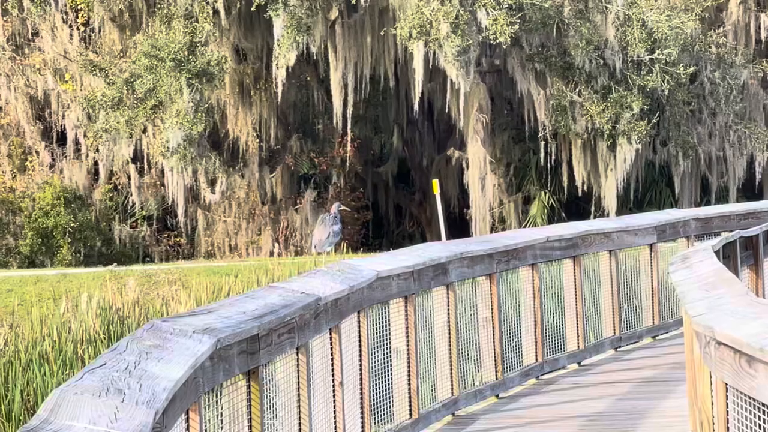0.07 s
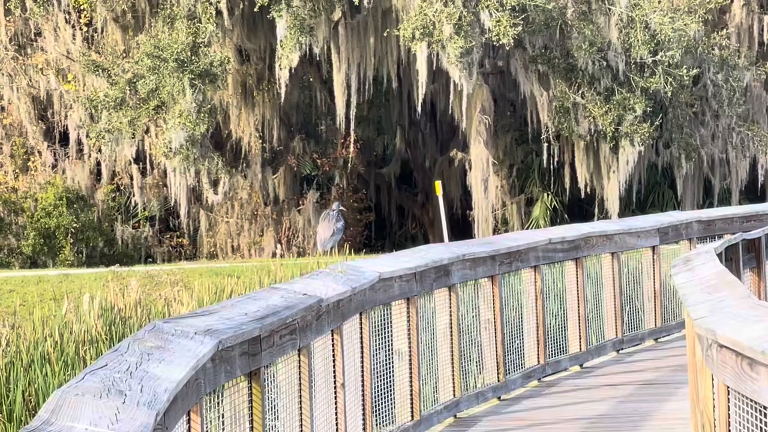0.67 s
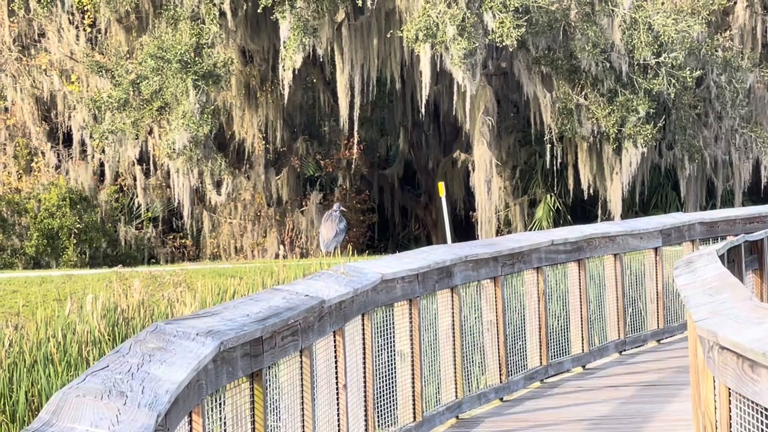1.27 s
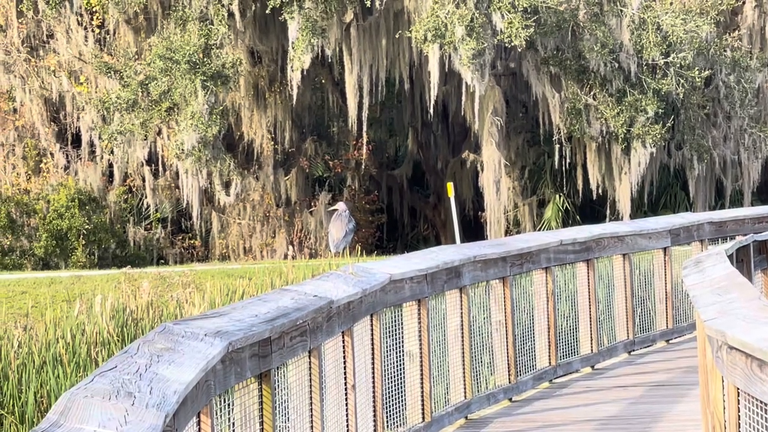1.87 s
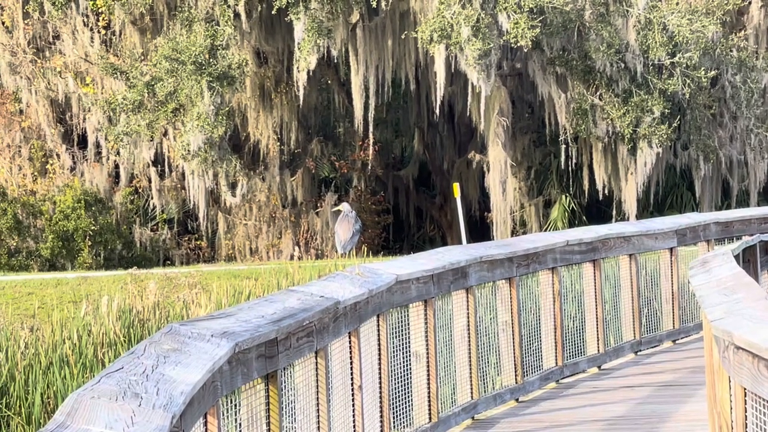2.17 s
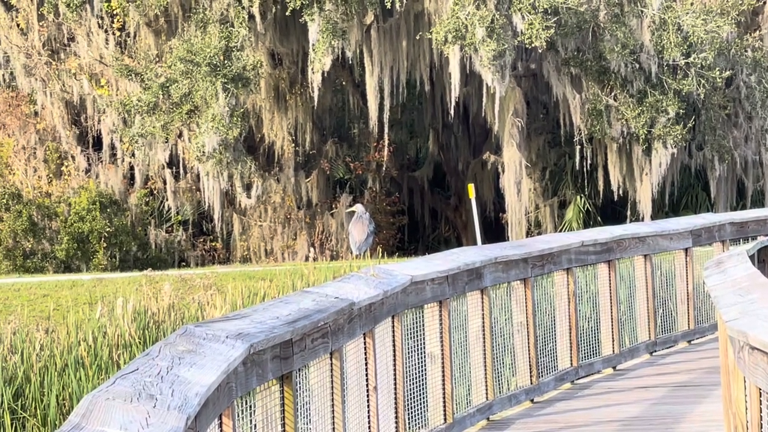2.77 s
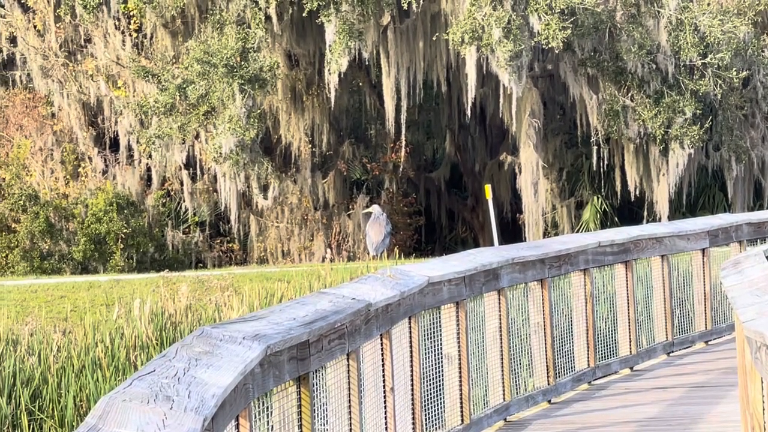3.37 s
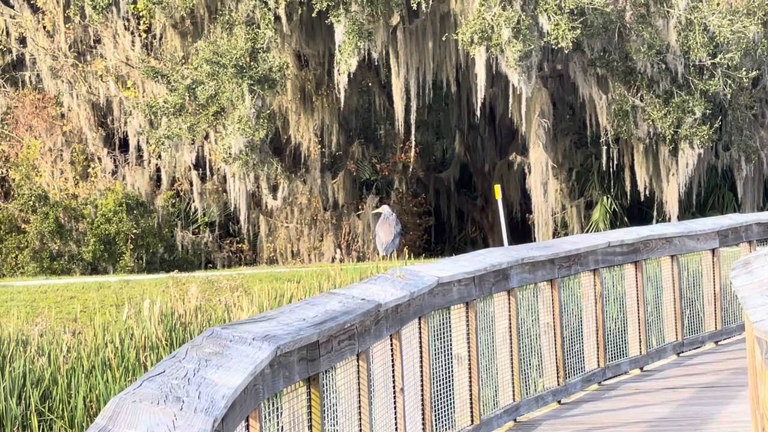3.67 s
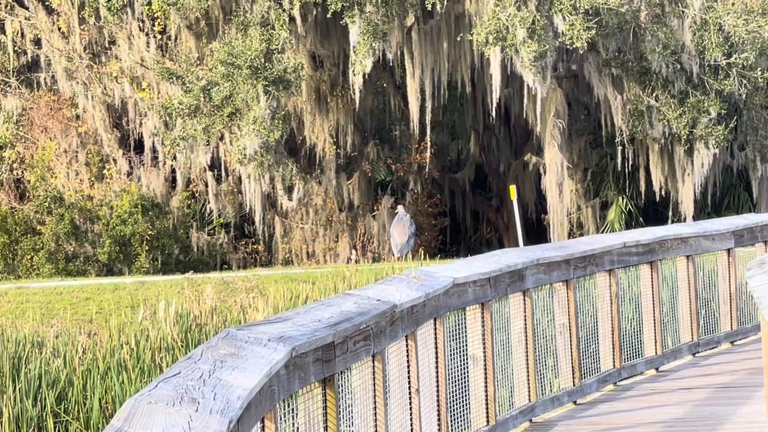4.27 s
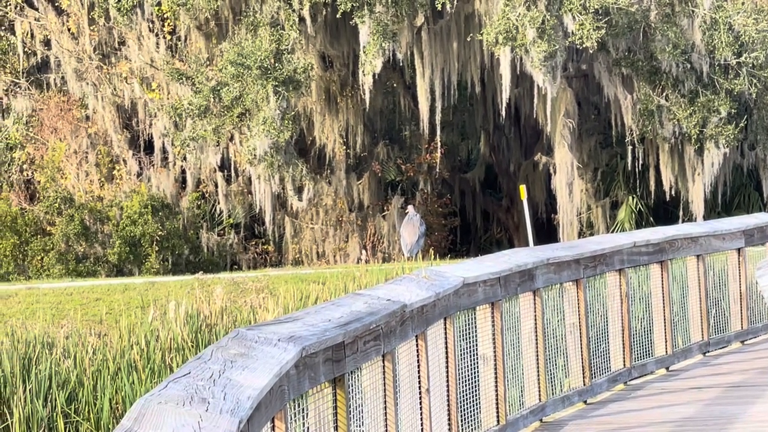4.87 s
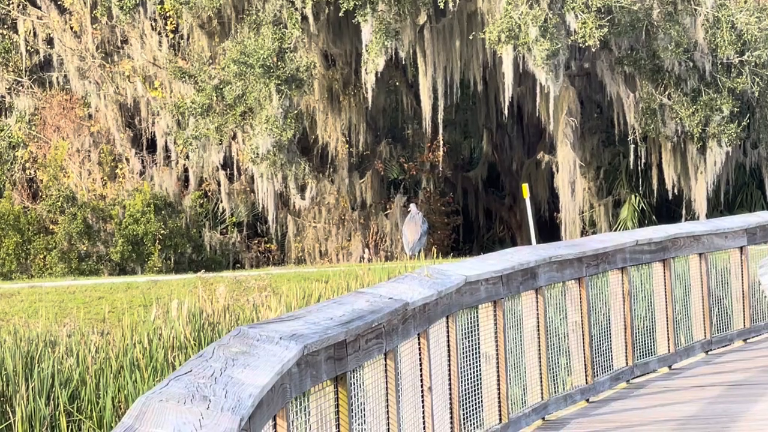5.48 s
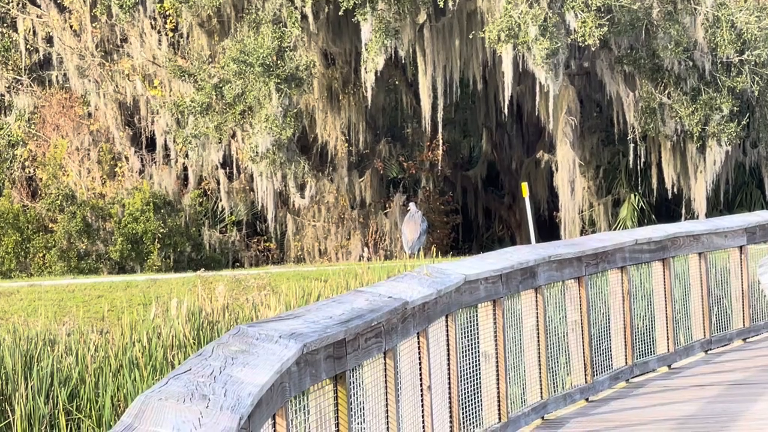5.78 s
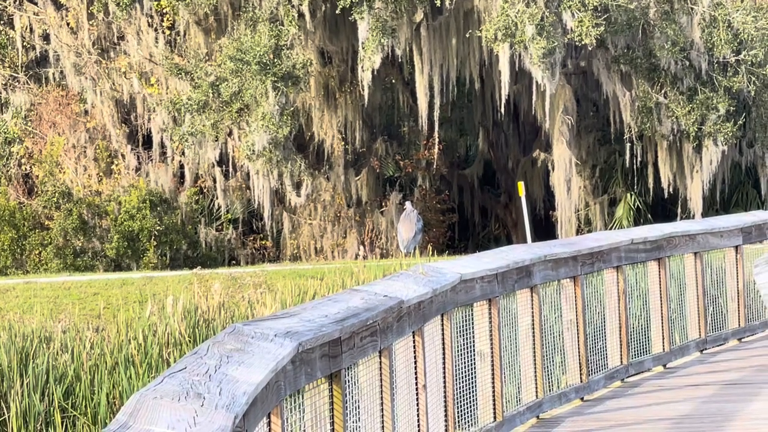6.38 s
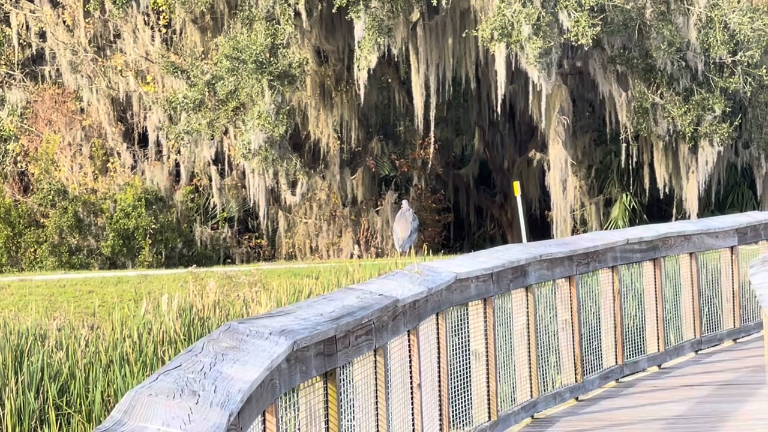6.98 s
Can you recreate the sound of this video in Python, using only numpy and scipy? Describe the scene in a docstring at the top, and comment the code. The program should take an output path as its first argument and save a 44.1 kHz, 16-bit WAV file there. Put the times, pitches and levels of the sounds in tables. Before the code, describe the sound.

A busy road far away is heard across a still marsh through a hand-held microphone. For the whole seven seconds, a deep, unevenly throbbing engine rumble blends with a soft, dull wash of tyres and a very faint hiss. One low exhaust drone is strongest at about 0.3 seconds, then fades into the distance over the next few seconds. Barely audible high blips and finger rubs begin near 0.6 seconds. At about 0.8 seconds there is a small dry snap close to the microphone, followed by tiny ticks. A soft, short hollow knock, like a plank, comes at 2 seconds. A second, weaker snap with a tick follows at 4 seconds. Very faint ticks, rubs and blips come and go around these. The traffic stays the main sound, its deep boom slowly growing a little towards the end.

```python
"""A still marsh heard from a boardwalk, with a busy road far off behind the trees.
From the start, engines rumble and tyres merge into a soft wash, over the hand-held phone's own hiss.
One exhaust drone is loudest at 0.3 s, then fades into the distance. Faint blips and finger rubs begin
near 0.6 s; a snap and ticks follow near 0.8 s, a hollow knock at 2 s and a second snap at 4 s.
Small ticks, rubs and blips come and go in between, while the deep boom of the engines slowly grows."""
import sys
import numpy as np
from scipy import signal
from scipy.fft import rfft, irfft
from scipy.io import wavfile
from scipy.ndimage import uniform_filter1d

SR = 44100
rng = np.random.default_rng(int(sys.argv[2]) if len(sys.argv) > 2 else 0)


def wav_record(signal):
    """Record a signal, one row per channel, as 16-bit PCM in the file named by sys.argv[1]."""
    frames = np.transpose(np.atleast_2d(signal))
    bounded = np.clip(frames, -1, 1)
    # unit amplitude maps onto the largest positive 16-bit level
    quanta = np.round(bounded * 32767).astype(np.int16)
    wavfile.write(sys.argv[1], SR, quanta)


N = 309582
TIME = np.arange(N) / SR
FREQ = np.maximum(np.fft.rfftfreq(N, 1 / SR), 1)
SIDES = np.array([[1], [-1]])  # left, right

# how alike far sound is at the two microphones: (frequency [Hz], likeness [0-1])
FAR_LIKENESS = [(60, .998), (120, .98), (200, 0.9), (310, 0.9), (540, 0.92), (940, 0.7), (1250, 0.7),
                (1480, 0.18), (1750, 0.8), (2100, .975), (2400, .999)]
# how far the left side runs ahead in far sound: (frequency [Hz], phase lead [rad])
FAR_LEFT_LEAD = [(50, -0.085), (140, -0.021), (350, .18), (540, .7), (780, .45), (1330, 0.9), (1650, -0.67),
                 (2100, -0.16), (2700, 0.21), (3100, 0.71)]
# how much louder far sound is on the left: (frequency [Hz], left minus right [dB])
FAR_LEFT_BOOST = [(60, 1.1), (140, 2.7), (330, 2.5), (600, 5), (800, 5.2), (1200, 4), (1550, 5.5),
                  (2000, 0)]
# the tone of the engine rumble: (frequency [Hz], relative level [dB])
RUMBLE_SPECTRUM = [(20, -33), (30, -18.5), (39, -7.5), (48, -2), (54, 0), (63, 2.5), (76, -3.5), (110, -11),
                   (125, -9.5), (146, -17.5), (170, -17.5), (200, -17.5), (250, -21.5), (310, -24),
                   (420, -31)]
# the strongest throbs and lulls of the deep boom: (middle time [s], level change [dB])
BOOM_THROBS = [(.41, -5), (.93, 4), (1.09, 3.5), (1.27, 6), (1.39, -4.5), (2.54, 4.5), (2.77, 2), (3.1, -5),
               (3.5, 4), (4.69, -1.5), (5.11, 5), (5.23, 3.5), (5.91, 2), (6.19, 2), (6.56, 3), (6.91, 2)]
# the tone of the tyre wash: (frequency [Hz], relative level [dB])
TYRE_SPECTRUM = [(250, -26.5), (380, -7), (480, -5.5), (620, -2), (790, 0), (1000, -2.5), (1400, -10),
                 (2000, -15.5), (2550, -22.5), (3000, -33), (3400, -37.5), (4200, -54.5)]
# the tone of the microphone hiss: (frequency [Hz], relative level [dB])
HISS_SPECTRUM = [(2500, -20.5), (3800, -4.5), (6000, -3.5), (7700, -3), (8700, 0.5), (9500, -0.5),
                 (10300, -8.5), (11200, -5.5), (12000, -11), (12500, -26)]
# stretches where the hiss is a little louder: (start time [s], length [s])
HISS_RISES = [(0.1, 1.12), (2.3, 0.48), (3.9, 0.24), (5.93, 1.3)]
# how far the left side runs ahead in near sounds and hiss: (frequency [Hz], phase lead [rad])
NEAR_LEFT_LEAD = [(3500, .25), (5500, 0), (8700, 0), (9400, -1.9), (10300, -2.6), (12000, -1.2)]
# the tones in the exhaust drone: (multiple of the firing rate [x], relative level [dB])
EXHAUST_HARMONICS = [(1, 3), (2, -7), (3, -2), (4, -15.5)]
# faint blips and whispers: (middle time [s], pitch [Hz], width [Hz], level [dB], half length [s])
FAINT_BLIPS = [(.57, 3300, 500, -82, 0.024), (0.773, 8700, 1200, -80, .02), (1.038, 3500, 600, -86, .015),
               (1.218, 3500, 600, -85, .015), (1.29, 4780, 1400, -89, .024),
               (1.615, 3270, 500, -81.5, 0.025), (2.54, 3650, 600, -84, .012), (2.68, 3450, 400, -89, .02),
               (2.77, 3500, 500, -89, .018), (3.995, 3780, 900, -86, 0.044), (4.02, 4500, 3000, -79, .0018),
               (4.43, 3300, 500, -84, .03), (4.525, 8350, 600, -86, .02), (4.777, 2800, 300, -72, .012),
               (5.94, 3200, 400, -81, .012), (6.06, 3420, 500, -84, .012), (6.33, 3400, 1000, -86.5, .025)]
# soft finger rubs: (middle time [s], level [dB], half length [s])
FINGER_RUBS = [(0.573, -88, .02), (.785, -82, 0.047), (1.285, -84.5, 0.023), (2.385, -91, .018),
               (3.99, -86, .055), (4.52, -88, .028)]
# finger ticks: (time [s], friction level [dB], rise time [s], time to fall 60 dB [s])
FINGER_TICKS = [(.8035, -70, .0008, .025), (0.806, -64.5, .002, 0.043), (2.372, -84, .001, .02),
                (2.39, -85, .003, .04), (2.525, -83, .001, .015), (2.538, -80, .0015, .02),
                (2.923, -83, .001, .015), (4.017, -72.5, .001, 0.022), (4.923, -83, .001, .012),
                (4.93, -83, .001, .02)]
# the pitches the phone case rings at: (pitch [Hz], width [Hz], relative level [dB])
CASE_RINGS = [(3700, 900, -10), (4920, 480, 2), (5600, 1000, -6.5), (7270, 790, -3), (8500, 1100, -0.5),
              (11000, 1200, -12)]
# two dry snaps, each followed by its bounce: (time [s], strength of the hit [dB])
SNAP_HITS = [(.753, -35), (.756, -46), (4.0162, -46), (4.0178, -48)]
# the pitches the snaps ring at: (pitch [Hz], width [Hz], gain [dB])
SNAP_RINGS = [(2550, 1000, 8), (3470, 370, -2), (6100, 1200, -10), (9000, 2100, 2.5), (11500, 1500, -11)]


def undb(db):
    """Turn decibels into a number to multiply by."""
    return 10 ** (np.asarray(db) / 20)


def unit(x):
    """Scale a sound so its average size (rms) is 1."""
    return x / np.sqrt(np.mean(x ** 2))


def over_freq(points):
    """Join (frequency, value) points into a curve, giving each octave equal room."""
    hz, value = np.transpose(points)
    return np.interp(np.log(FREQ), np.log(hz), value)


def colour(points):
    """Turn a spectrum table into a filter that falls steeply beyond its ends."""
    skirts = np.minimum(FREQ / points[0][0], 1) * np.minimum(points[-1][0] / FREQ, 1)
    return undb(over_freq(points)) * skirts ** 6


def resonance(hz, width_hz):
    """A filter that rings at one pitch; the narrower it is, the longer it rings."""
    return 1 / (1 + 1j * (FREQ ** 2 - hz ** 2) / (FREQ * width_hz))


def shape(x, response):
    """Pass a sound through a filter."""
    return irfft(rfft(x) * response, N)


def noise(response):
    """Filtered noise of average size 1."""
    return unit(shape(rng.standard_normal(N), response))


def wander(rate_hz):
    """A smooth random curve of average size 1 that moves about rate_hz times a second."""
    hz = np.fft.rfftfreq(N, 1 / SR)
    return noise(np.exp(-(hz / rate_hz) ** 2) * (hz > 0))


def swell(middle_s, half_s):
    """A bell-shaped rise and fall."""
    return np.exp(-((TIME - middle_s) / half_s) ** 2 / 2)


def hold(start_s, length_s, edge_s):
    """Rise from 0 to 1, hold and fall back; half way up at the start and at the end."""
    inside_s = np.minimum(TIME - start_s, start_s + length_s - TIME)
    return np.clip(.5 + inside_s / edge_s, 0, 1)


def strike(peak_s, rise_s, fall_s):
    """Rise quickly to 1, then die away by 60 dB in fall_s."""
    age = TIME - peak_s
    return np.exp(np.minimum(age / rise_s, -np.log(1000) * age / fall_s))


def far_noise(response):
    """Noise from a wide horizon: alike on both sides in the bass, mostly earlier and louder on the left."""
    likeness = np.clip(over_freq(FAR_LIKENESS), 0, 1)
    shared, apart = rfft(rng.standard_normal((2, N)))
    spectra = shared * np.sqrt(1 + likeness) + SIDES * apart * np.sqrt(1 - likeness)
    balance = undb(SIDES * over_freq(FAR_LEFT_BOOST) / 2)
    lead = np.exp(1j * SIDES * over_freq(FAR_LEFT_LEAD) / 2)
    pair = irfft(spectra * balance * lead * response, N)
    return pair / np.std(pair.mean(axis=0))


def engine_rumble(body_db=-42, boom_db=-45, rise_db_per_s=0.45, split_hz=100):
    """Many far engines beat together: the deep boom swells and sinks over a steady body."""
    pair = far_noise(colour(RUMBLE_SPECTRUM))
    boom = shape(pair, 1 / (1 + (FREQ / split_hz) ** 8))
    body = pair - boom
    # even out the boom over 0.17 s, so its quick random beating stays but its slow drift goes
    slow_level = np.sqrt(uniform_filter1d(boom.mean(axis=0) ** 2, int(0.17 * SR)))
    throbs_db = sum(db * swell(s, half_s=0.039) for s, db in BOOM_THROBS)
    boom_gain = undb(boom_db + rise_db_per_s * TIME + throbs_db)
    return boom / slow_level * boom_gain + body * undb(body_db)


def tyre_wash(level_db=-53, ebb_db_per_s=0.0628, waver_db=0.57, flutter_db=1.9, flutter_hz=3200):
    """Tyre roar dulled by distance; moving air makes each band waver, the highest most."""
    pair = far_noise(colour(TYRE_SPECTRUM))
    octave = np.log2(FREQ)
    wash = 0
    for centre in np.arange(7, 13, .5):  # half-octave bands from 128 Hz up
        band = shape(pair, np.maximum(1 - 2 * abs(octave - centre), 0))
        depth_db = waver_db + flutter_db * min(2 ** centre / flutter_hz, 1) ** 4
        wash = wash + band * undb(depth_db * wander(rate_hz=14))
    # the low end thins out for a while
    low_end = shape(wash, abs(resonance(hz=428, width_hz=220)) ** 2)
    dip_db = -1.5 * swell(middle_s=3.3, half_s=.7)
    wash = wash + low_end * (undb(dip_db) - 1)
    return wash * undb(level_db - ebb_db_per_s * TIME)


def microphone_hiss(level_db=-86.9, lift_db=1.65, apart_db=-16, whine_db=-21):
    """The microphone's own smooth hiss with a trace of whine; now and then it lifts a little."""
    hiss = noise(colour(HISS_SPECTRUM))
    whine = undb(whine_db) * noise(resonance(hz=4802, width_hz=130) ** 2)
    apart = undb(apart_db) * noise(colour(HISS_SPECTRUM)) * SIDES
    lift = sum(hold(s, length_s, edge_s=0.22) for s, length_s in HISS_RISES)
    return (hiss + whine + apart) * undb(level_db + lift_db * lift)


def exhaust_drone(firing_hz=67.92, peak_db=-51, loudest_s=0.31, rise_db_per_s=22, fall_db_per_s=6):
    """One engine's firing makes a stack of tones that comes up, then fades into the distance."""
    age = TIME - loudest_s
    level_db = peak_db + np.minimum(rise_db_per_s * age, -fall_db_per_s * age)
    pitch_hz = firing_hz * (1 + .022 * wander(rate_hz=15.2))
    phase = 2 * np.pi * np.cumsum(pitch_hz) / SR
    drone = 0
    for multiple, db in EXHAUST_HARMONICS:
        fading_db = 3 * wander(rate_hz=20)  # each tone fades in and out on its long path
        drone = drone + undb(db + fading_db) * np.sin(multiple * phase)
    return np.sqrt(2) * drone * undb(level_db + SIDES)  # the left is 2 dB louder than the right


def blips():
    """Brief puffs of noise, each around one pitch, that barely rise over the wash."""
    return sum(noise(resonance(hz, width_hz) ** 2) * undb(db) * swell(s, half_s)
               for s, hz, width_hz, db, half_s in FAINT_BLIPS)


def finger_rubs_and_ticks(grain_db=3, contact_boost_db=10, top_hz=11500):
    """Fingers rub and tick on the phone: fine friction and sharp contacts make the case ring."""
    force = sum(undb(db) * swell(s, half_s) for s, db, half_s in FINGER_RUBS)
    contact = np.zeros(N)
    for s, db, rise_s, fall_s in FINGER_TICKS:
        force = force + undb(db) * strike(s, rise_s, fall_s)
        contact[int(s * SR)] = undb(db + contact_boost_db)
    case = sum(undb(db) * resonance(hz, width_hz) for hz, width_hz, db in CASE_RINGS)
    case = case / (1 + (FREQ / top_hz) ** 30)
    case = case / np.sqrt(np.mean(abs(case) ** 2))  # change the tone but not the power
    friction = unit(rng.standard_normal(N) * undb(grain_db * wander(rate_hz=400)))
    return shape(contact + force * friction, case)


def snaps():
    """Something small and hard clicks under the grip, bouncing once each time."""
    contact = np.zeros(N)
    for s, db in SNAP_HITS:
        contact[int(s * SR)] = undb(db)
    ringing = sum(undb(db) * resonance(hz, width_hz) ** 2 for hz, width_hz, db in SNAP_RINGS)
    return shape(contact, ringing)


def knock(time_s=2.0515, pitch_hz=482, level_db=-43.5):
    """A soft hollow knock, perhaps a plank: one low tone that builds and dies quickly."""
    tone = np.sqrt(2) * np.sin(2 * np.pi * pitch_hz * (TIME - time_s))
    return undb(level_db) * strike(time_s, rise_s=0.0026, fall_s=0.026) * tone


def scene():
    """Add up the far road, the small near sounds and the hiss."""
    road = engine_rumble() + tyre_wash() + exhaust_drone()
    centred = blips() + knock()
    phone = finger_rubs_and_ticks() + snaps() + microphone_hiss()
    # the two microphones drift out of step in the highest treble
    lead = np.exp(1j * SIDES * over_freq(NEAR_LEFT_LEAD) / 2)
    return road + centred + shape(phone, lead)


def record(dry, start_s=0.037, fade_s=0.045, top_hz=13000):
    """The phone fades in as it starts and cuts off the highest treble."""
    fade_in = 1 - np.exp(-np.maximum(TIME - start_s, 0) / fade_s)
    treble_cut = signal.ellip(8, .2, 70, top_hz, fs=SR, output="sos")
    return signal.sosfilt(treble_cut, dry * fade_in)


dry = scene()
out = record(dry)
wav_record(out)
```